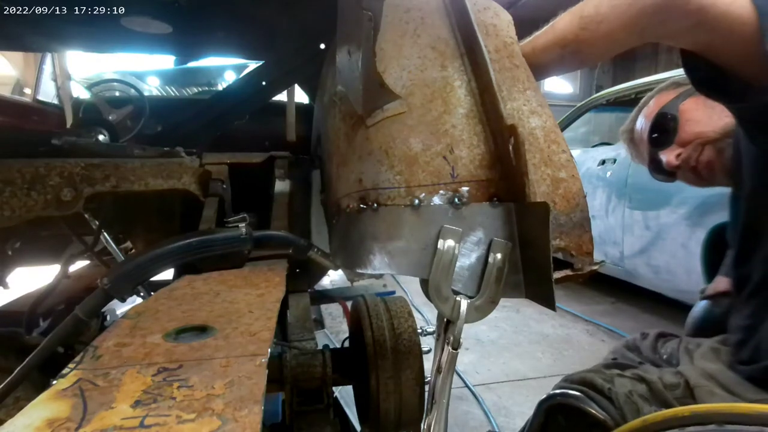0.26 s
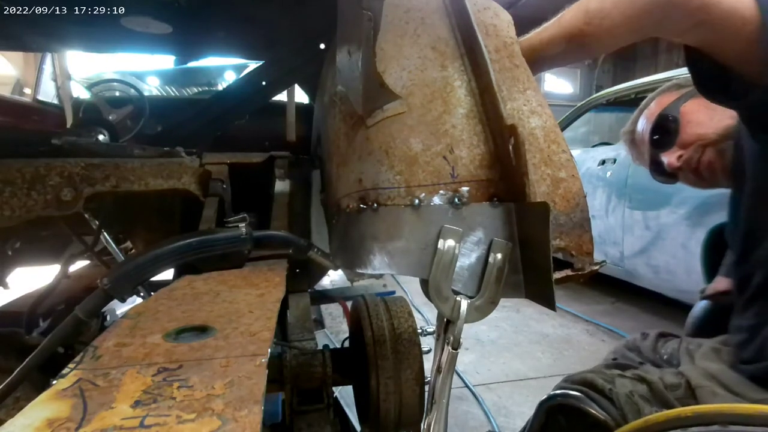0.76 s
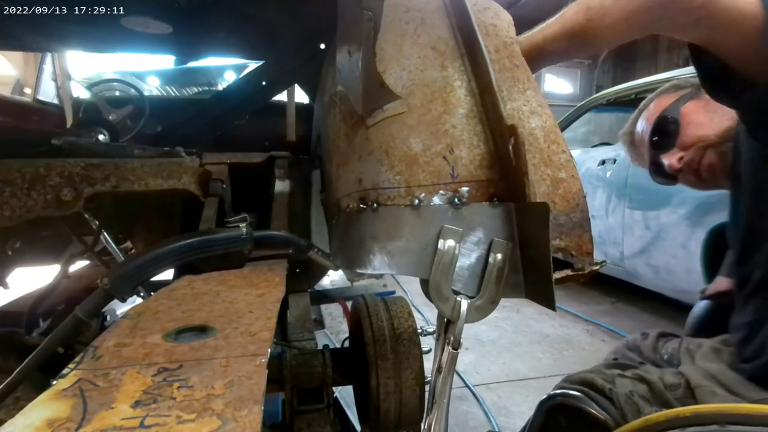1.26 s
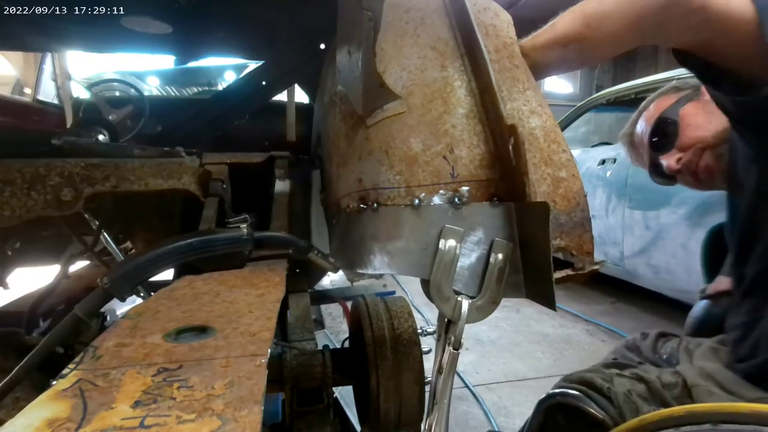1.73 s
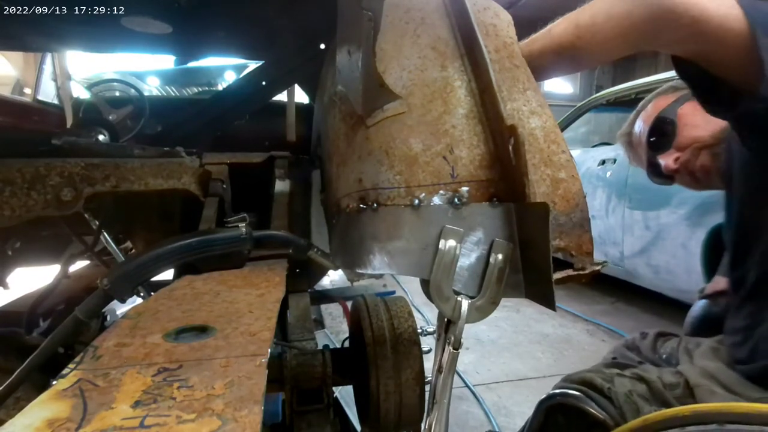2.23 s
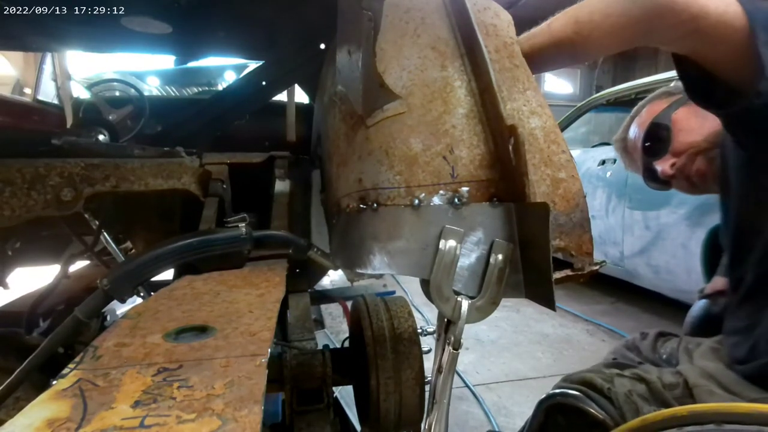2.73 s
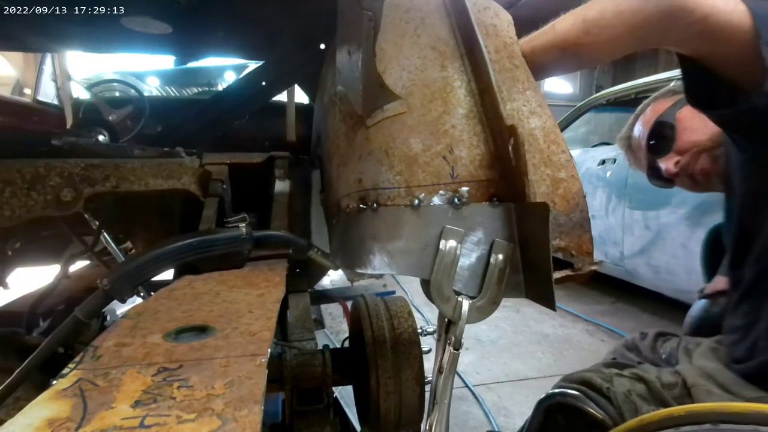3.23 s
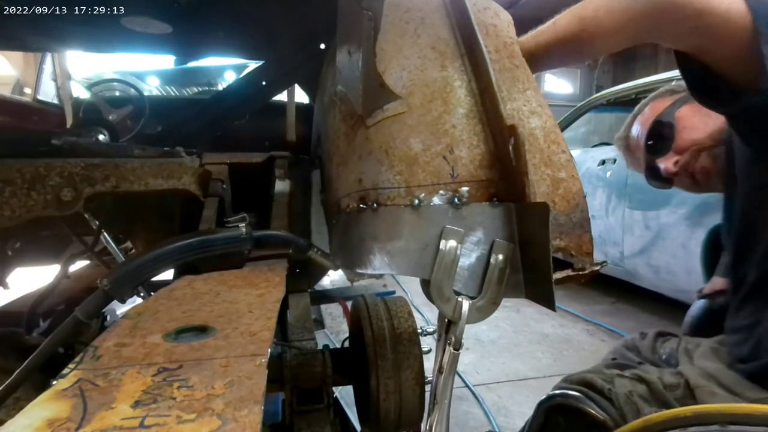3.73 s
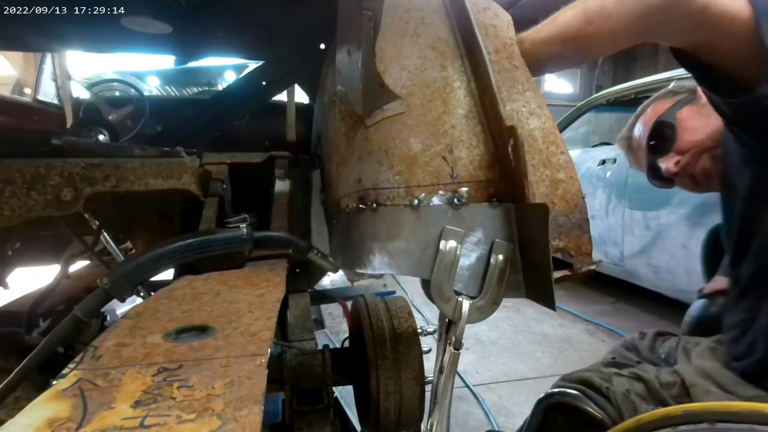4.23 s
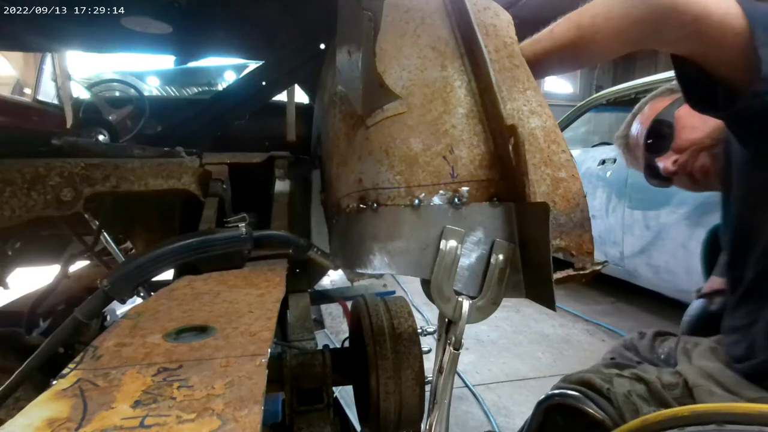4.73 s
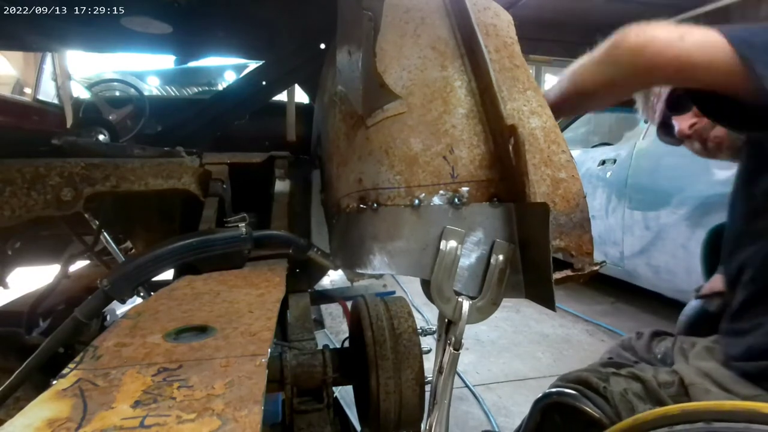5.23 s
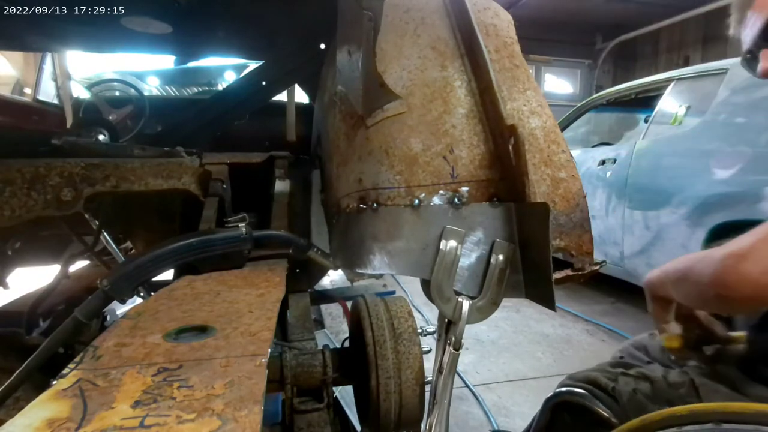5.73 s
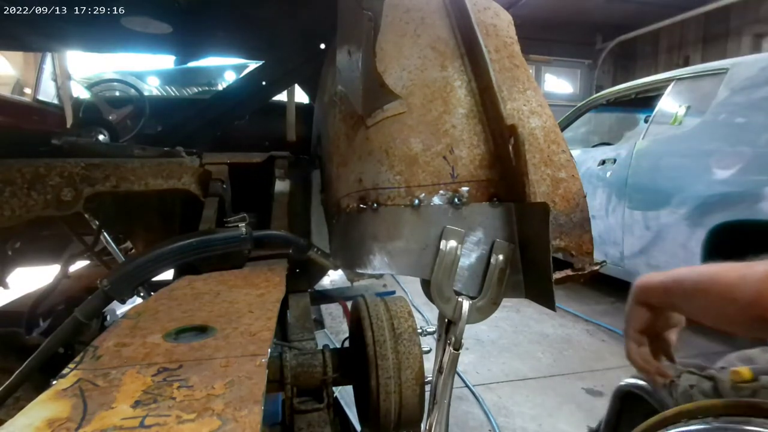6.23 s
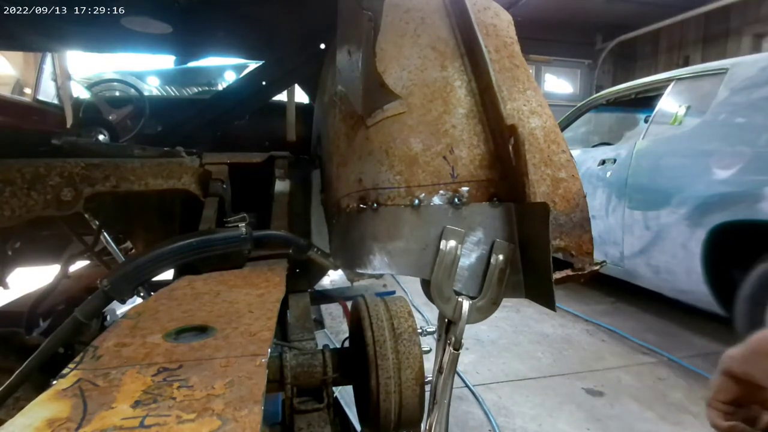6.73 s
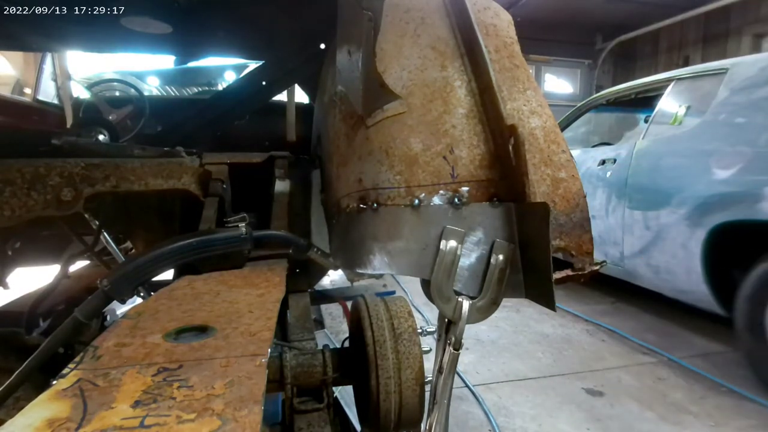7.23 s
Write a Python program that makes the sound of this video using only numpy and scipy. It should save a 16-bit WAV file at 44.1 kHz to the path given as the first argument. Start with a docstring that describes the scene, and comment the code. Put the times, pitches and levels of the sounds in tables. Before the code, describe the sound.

Close to an overloaded microphone in a hard garage, steady hammering on sheet metal: flat-topped crashes, midrange-heavy boom, short rattles, each tail running into the next blow. The pace quickens slightly and later hits are brighter. Hammering ends around five seconds; the boom decays into soft ventilation-like hum and a tiny high pulsing chirr, then a wooden-sounding knock and a small steel clink.

```python
"""The last ring of a blow dies away, then a hammer beats a steel patch on a truck's body panel fourteen times.
Each blow is noise for the crash, fading sines and noise for the booming panel, truck body and garage, and chattering ticks.
The overloaded microphone flattens the waves, so every blow starts as a flat-topped crash.
Small ticks fall in between; at the end the hammer is put down with a knock, a clack and a clink, made of noise and sines.
Behind it lie a fan-like hum of noise and wavering tones, and a faint, high, pulsing chirr of narrow noise."""
import sys
import numpy as np
from scipy import signal
from scipy.fft import rfft, irfft, next_fast_len
from scipy.io import wavfile
from scipy.ndimage import uniform_filter1d

SR = 44100
rng = np.random.default_rng(int(sys.argv[2]) if len(sys.argv) > 2 else 0)


def persist_wave(psi):
    """Save psi, clipped to +-1, as 16-bit WAV."""
    counts = np.round(np.clip(psi, -1, 1) * 32767).astype(np.int16)
    wavfile.write(sys.argv[1], SR, np.atleast_2d(counts).T)


N = 329868
TIME = np.arange(N) / SR  # seconds through the whole scene
RING = np.arange(65536) / SR  # seconds since the start of one blow or knock

# strong modes of the panel, before each blow's random changes: pitch_hz [Hz], level_db [dB],
# t60_s [s, time to fade by 60 dB]
PANEL_MODES = [(84.87, -10, 0.58), (153.7, -11, 0.69), (207, -5, 0.44), (231, -7.5, 0.74), (246.9, 3, 0.36),
               (264, -3, 0.48), (283.7, -4, 0.35), (301, -9.5, 0.64), (314.9, -6, 0.42), (344.4, -7, 0.66),
               (381.6, -3.5, 0.38), (398.5, -3.5, 0.56), (424, -1.5, 0.41), (432, 2.5, 0.37),
               (506, -7.5, 0.56), (541, -6, 0.51), (571, -8, 0.62), (589, -9, 0.51), (600.3, -7, 0.48),
               (650.5, -4, 0.39), (674, -17, 0.42), (727, -7, .4), (763, -7, 0.31), (813, -10.5, 0.4),
               (865, -11.5, 0.39), (946, -14, 0.59), (1073, -10.5, .35), (1228, -12.5, 0.15),
               (2370, -13, 0.25), (3230, -21, .24)]


def undb(db):
    """Turn decibels into a gain."""
    return np.exp(np.asarray(db) * (np.log(10) / 20))


def unit(x):
    """Scale to an rms (average strength) of 1."""
    return x / np.sqrt(np.mean(x ** 2))


def add(out, start_s, sound):
    """Mix a sound in; whatever falls outside the scene is left off."""
    start = int(round(start_s * SR))
    part = sound[max(-start, 0):len(out) - start]
    first = max(start, 0)
    out[first:first + len(part)] += part


def log_bins(size):
    """Give the log frequency of each spectral bin."""
    return np.log(np.maximum(np.fft.rfftfreq(size, 1 / SR), 1))


def bell(log_hz, hz, octaves):
    """Draw a smooth hump around one pitch."""
    distance = (log_hz - np.log(hz)) / (octaves * np.log(2))
    return np.exp(-.5 * distance ** 2)


def cut(x, hz, kind, order=2):
    """Filter away what lies above ("low") or below ("high") a frequency."""
    sections = signal.butter(order, min(hz, SR / 2 - 1000), kind, fs=SR, output="sos")
    return signal.sosfilt(sections, x)


def walk(rate_hz, time=TIME):
    """Wander at random: straight lines between random points, rate_hz points per second, spread near 1."""
    points = rng.standard_normal(256)
    return np.interp(time * rate_hz, np.arange(len(points)), points)


def carry_over(old, likeness):
    """Draw a random state that keeps the given share (0-1) of the one before."""
    keep = np.clip(likeness, 0, 1)
    return keep * old + np.sqrt(1 - keep ** 2) * rng.standard_normal(old.shape)


def hammering(wash_db=4, modes_db=0, rattle_db=-25, rise_s=0.0032, spot_likeness=0.679):
    """Each blow: the crash of steel on steel, then the ringing panel, its chatter and the room."""
    # hammer blows, the first heard only as a dying ring: start_s [s], strength_db [dB], bright_db [dB]
    blows = [(-0.29, -9, -2), (0.1189, -3.5, -4), (0.5326, -1, -6), (0.943, 0.34, -7), (1.3653, 1, -4.5),
             (1.737, 1.05, -2.5), (2.108, 0.3, -2), (2.4668, -3.5, -2), (2.823, -0.6, -3.5),
             (3.1661, -5, -1.5), (3.5295, -0.7, 2), (3.879, 2, -0.5), (4.2317, -0.3, 2),
             (4.5638, 2.5, -3.5), (4.8913, 1.5, -2)]
    out, bins = np.zeros(N), log_bins(len(RING))
    spot = rng.standard_normal((len(PANEL_MODES), 4))
    weak_modes = rng.standard_normal(len(RING))
    # the bending spreads over the panel within milliseconds; the last of the boom fades to nothing
    rise = 1 - np.exp(-RING / rise_s)
    fade = np.clip(2 * (1 - RING / RING[-1]), 0, 1) ** 2
    for start_s, strength_db, bright_db in blows:
        # the hammer wanders little: blows on nearly the same spot ring nearly alike
        spot = carry_over(spot, spot_likeness)
        weak_modes = carry_over(weak_modes, spot_likeness)
        ring = undb(wash_db) * wash(weak_modes) + undb(modes_db) * modes(spot)
        mixed = ring + crash() + undb(rattle_db) * rattle()
        body = irfft(rfft(mixed) * undb(blow_colour(bins, strength_db, bright_db)))
        add(out, start_s, rise * fade * body)
    return out


def crash(level_db=-5, hold_s=0.018, t60_s=0.21, top_hz=2800):
    """Steel on steel: noise that holds for a moment while the patch buzzes against the panel, then dies."""
    fading = undb(level_db - 60 * np.maximum(RING - hold_s, 0) / t60_s)
    noise = unit(cut(rng.standard_normal(len(RING)), top_hz, "low"))
    return fading * clatter() * noise


def clatter(rate_hz=70, depth_db=3):
    """Uneven surges of level as the patch slaps against the panel."""
    return undb(depth_db * walk(rate_hz, RING))


def modes(spot, scatter_db=1.02, detune=.002, build_cycles=1.8):
    """Strong modes as fading sines; the struck spot sets size and phase, and the denting shifts their pitch a little."""
    out, t = 0, RING.astype(np.float32)
    for (pitch_hz, level_db, t60_s), (size, shift, across, along) in zip(PANEL_MODES, spot.tolist()):
        shifted_hz = pitch_hz * (1 + detune * shift)
        phase = float(np.arctan2(across, along))
        swing = np.sin(float(2 * np.pi * shifted_hz) * t + phase)
        # each needs a few cycles to fill the truck body, so the deep ones arrive late
        build = -np.expm1(-t * float(pitch_hz / build_cycles))
        fading = np.exp(-t * float(np.log(1000) / t60_s))
        out = out + float(undb(level_db + scatter_db * size)) * build * fading * swing
    return out


def wash(noise):
    """Countless weaker modes and the garage's echo, blurred together: each band of noise dies at its own pace."""
    # shape of the wash, only the differences in level count: pitch_hz [Hz], level_db [dB per Hz], t60_s [s]
    wash_bands = [(24.8, -16.5, 0.9), (65, -13, 1.7), (128, -10.5, 1.11), (241, -1, 0.74), (444, 1.5, 0.57),
                  (685, 0.5, 0.51), (970, -0.5, 0.42), (1490, -13, 0.4), (1974, -15.5, 0.37),
                  (3110, -26.5, 0.42), (5500, -34, 0.41), (8010, -33.5, 0.32), (16000, -44.5, .24)]
    pitch_hz, level_db, t60_s = np.transpose(wash_bands)
    bins = log_bins(len(RING))
    spectrum = rfft(noise) * unit(undb(np.interp(bins, np.log(pitch_hz), level_db)))
    out = np.zeros(len(RING))
    for row, band_t60_s in zip(np.eye(len(pitch_hz)), t60_s):
        band = np.interp(bins, np.log(pitch_hz), row)  # 1 at this pitch, sloping to 0 at its neighbours
        out += irfft(spectrum * band) * undb(-60 * RING / band_t60_s)
    return out


def rattle(t60_s=0.53, scatter_db=4, tick_fade_s=.002, low_hz=1500, top_hz=6000, count=40):
    """The clamp and the loose edge of the patch chatter: short noise ticks, weaker the later they come."""
    ticks = np.zeros(len(RING))
    for when_s, size in zip(rng.uniform(0, 1 / 3, count), rng.standard_normal(count)):
        tick = rng.standard_normal(512) * np.exp(-RING[:512] / tick_fade_s)
        tick_db = scatter_db * np.clip(size, -2, 2) - 60 * when_s / t60_s
        add(ticks, when_s, tick * undb(tick_db))
    return cut(cut(ticks, low_hz, "high", order=1), top_hz, "low")


def blow_colour(bins, strength_db, bright_db):
    """Gain in dB at each pitch: a harder blow is louder, but its bass hardly grows and its boom grows less."""
    bass = (2.5 - 0.9 * strength_db) * bell(bins, 90, 0.8)
    boom = (0.1 - 0.3 * strength_db) * bell(bins, 247, .35)
    clang = 1.18 * bell(bins, 715, 0.42)
    bright = bright_db * bell(bins, 4000, 1.65)
    return strength_db + bass + boom + clang + bright


def knocks(room_t60_s=0.51, room_db=-12, low_hz=80, ring_db=5, hollow_db=10, hollow_hz=830, thud_hz=150):
    """Light contacts of tool and hand: a noise burst with a thud, a hollow note and a high ring, and the garage's answer."""
    # small knocks and ticks: start_s [s], level_db [dB, start of the burst without the room], top_hz [Hz, highest ring]
    contacts = [(1.986, -54, 9530), (2.448, -40, 6100), (3.04, -52, 9100), (5.346, -55.5, 10060),
                (6.278, -42, 7400), (6.303, -24, 2035), (6.652, -35.5, 5000), (6.657, -38.5, 9600),
                (6.662, -35, 5730)]
    out, bins = np.zeros(N), log_bins(len(RING))
    for start_s, level_db, top_hz in contacts:
        # a softer contact rings lower, lasts longer and thuds more
        octaves = np.log2(top_hz / 4000)
        t60_s = 0.057 * 0.84 ** octaves
        thud_db = 11 - 5.5 * octaves
        hollow = hollow_db * bell(bins, hollow_hz, .1)
        high_ring = ring_db * bell(bins, top_hz, .06)
        thud = thud_db * bell(bins, thud_hz, 1.0)
        burst = irfft(rfft(rng.standard_normal(len(RING))) * undb(hollow + high_ring + thud))
        body = cut(cut(burst, top_hz, "low", order=6), low_hz, "high")
        fading = undb(-60 * RING / t60_s) + undb(room_db - 60 * RING / room_t60_s)
        add(out, start_s, unit(body) * undb(level_db) * fading)
    return out


def clink(start_s=6.661):
    """The steel hammer head rings briefly where it touches down: a few fading sines."""
    # ringing notes of the head: pitch_hz [Hz], level_db [dB, peak at the start], t60_s [s]
    head_notes = [(3500, -42, 0.16), (4054, -51, 0.3), (4371, -53, 0.33), (6550, -49, 0.2)]
    out = np.zeros(N)
    for pitch_hz, level_db, t60_s in head_notes:
        add(out, start_s, undb(level_db - 60 * RING / t60_s) * np.sin(2 * np.pi * pitch_hz * RING))
    return out


def background(air_db=-43, air_sway_db=1.4, hum_sway_db=3.1, drift_hz=0.58):
    """A distant fan: soft rushing air from shaped noise, and a few tones wavering in pitch and level."""
    # shape of the air noise, only the differences in level count: pitch_hz [Hz], level_db [dB per Hz]
    air_shape = [(25, -9), (65, 2), (130, -9.5), (280, 2), (400, -8), (700, -5), (1000, -15), (1300, -19),
                 (2000, -28), (3000, -30.5), (5000, -35), (7500, -37.5), (16000, -42.5)]
    # hum tones: pitch_hz [Hz, middle of the drift], level_db [dB rms, middle of the sway]
    hum_tones = [(274.5, -55), (479.3, -49), (635, -59), (1028, -57.5)]
    shape_hz, shape_db = np.transpose(air_shape)
    gain = undb(np.interp(log_bins(N), np.log(shape_hz), shape_db))
    air = unit(irfft(rfft(rng.standard_normal(N)) * gain, N))
    out = air * undb(air_db + air_sway_db * walk(6))
    for pitch_hz, level_db in hum_tones:
        phase = 2 * np.pi * np.cumsum(pitch_hz + drift_hz * walk(8.3)) / SR
        level = undb(level_db + hum_sway_db * walk(5.5))
        out = out + np.sqrt(2) * level * np.sin(phase)
    return out


def chirr(pitch_hz=5030, octaves=.025, level_db=-66, sharpness=1.1, early_db=-6, period_s=.433):
    """Narrow noise, like a cricket outside, swelling a little over twice a second and slowly growing."""
    pulse = (.5 + .5 * np.cos(2 * np.pi * (TIME - 5.41) / period_s)) ** sharpness
    flutter = undb(2 * walk(14))
    song = unit(irfft(rfft(rng.standard_normal(N)) * bell(log_bins(N), pitch_hz, octaves), N))
    growth_db = np.interp(TIME, [2.8, 5.4], [early_db, 0])
    return undb(level_db + growth_db) * pulse * flutter * song


def scene():
    """Everything that reaches the microphone."""
    return (hammering() + knocks() + clink() + background() + chirr())[None]


def record(dry, ceiling=0.73, knee=14, ripple_db=-17, ripple_hz=4000, low_hz=6, top_hz=15900):
    """The port colours the sound, the overloaded input flattens the waves, the flat tops ripple and the treble ends steeply."""
    # colour of the microphone port: pitch_hz [Hz], gain_db [dB]
    port = [(2100, -0.5), (2850, -6.5), (3500, -2), (6200, -1), (7200, -6.5), (9000, -2), (12000, -4)]
    pitch_hz, gain_db = np.transpose(port)
    size = next_fast_len(N + len(RING), real=True)
    port_gain = undb(np.interp(log_bins(size), np.log(pitch_hz), gain_db))
    heard = irfft(rfft(dry, size) * port_gain, size)[:, :N]
    # a high knee keeps waves below the ceiling nearly untouched
    flat = heard / (1 + np.abs(heard / ceiling) ** knee) ** (1 / knee)
    lost = np.minimum(np.abs(heard - flat) / 2, 1)
    overload = uniform_filter1d(lost, size=256, axis=1)
    noise = cut(rng.standard_normal(N), ripple_hz, "low", order=1)
    ripple = unit(cut(noise, 430, "high", order=1))
    rippled = flat + undb(ripple_db) * overload * np.abs(flat) * ripple
    out = cut(rippled, low_hz, "high", order=1)
    steep = signal.firwin(255, top_hz, fs=SR, window=("kaiser", 8))
    return signal.fftconvolve(out, steep[None], "same", axes=1)


dry = scene()
out = record(dry)
persist_wave(out)
```